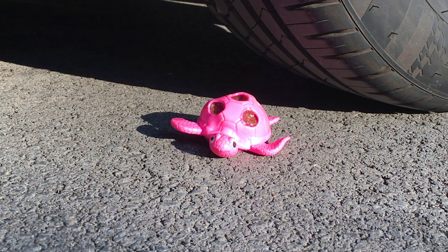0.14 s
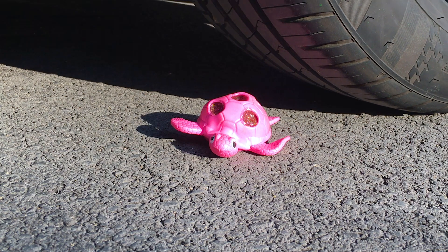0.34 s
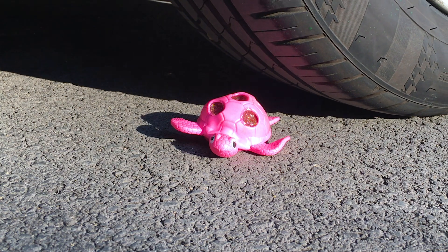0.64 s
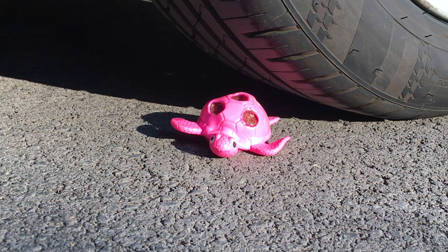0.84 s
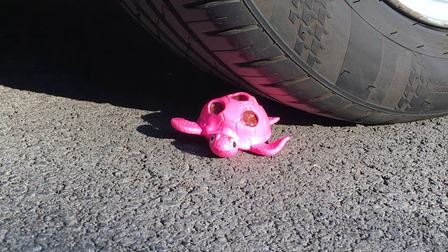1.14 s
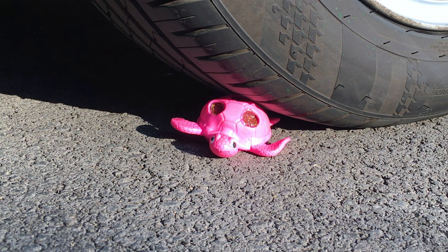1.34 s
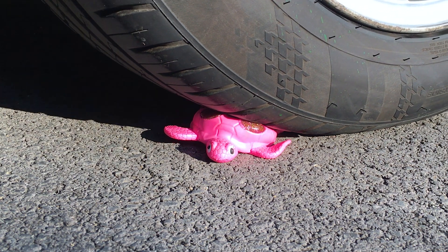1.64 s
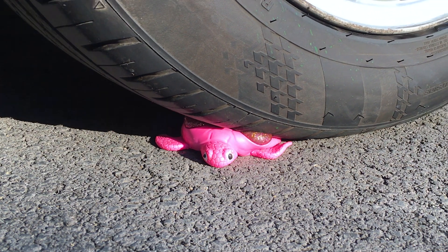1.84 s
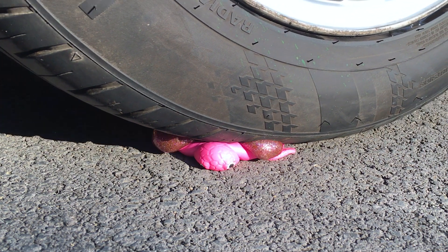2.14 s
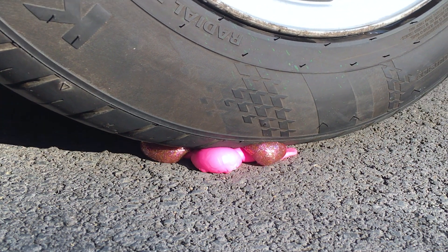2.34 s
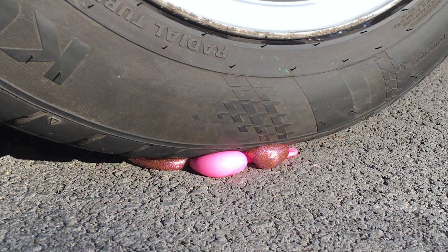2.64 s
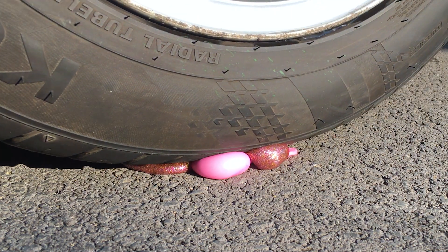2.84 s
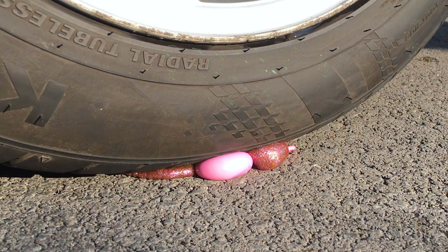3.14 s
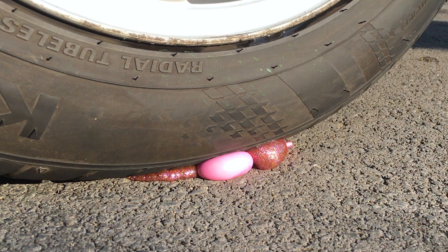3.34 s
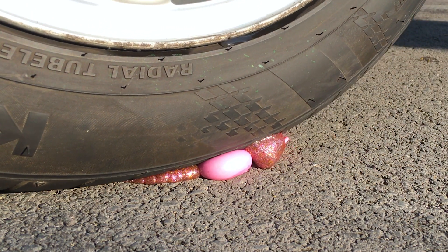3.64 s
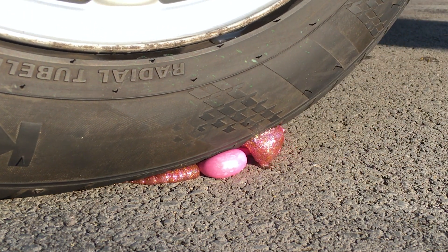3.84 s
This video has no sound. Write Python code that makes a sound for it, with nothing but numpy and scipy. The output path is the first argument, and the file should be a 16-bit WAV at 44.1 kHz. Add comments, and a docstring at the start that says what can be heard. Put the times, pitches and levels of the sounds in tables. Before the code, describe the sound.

A gel-filled toy is squashed by a car tyre on asphalt: low engine idle rises first, then wet spits and crackles, sharp pops, and a sputtering, squealing split at the end; close microphone outdoors.

```python
"""On asphalt, close to the microphone, a car creeps at idle over a soft gel-filled toy.
The engine, throbbing tones and noise with a faint whine, rises from silence; its belt swishes.
Shaped noise makes air spit from the skin, random clicks make gel and grit crackle, and ringing clicks snap and pop.
At last the toy splits: a sputter of noise puffs leads into a brief squeal made of gliding sine tones.
The car body and road echo a little, which is made with decaying noise."""
import sys
import numpy as np
from scipy import signal
from scipy.fft import rfft, irfft
from scipy.io import wavfile
from scipy.ndimage import uniform_filter1d

SR = 44100
rng = np.random.default_rng(int(sys.argv[2]) if len(sys.argv) > 2 else 0)


def put_to_file(sound):
    """Save the sound as 16-bit audio at rate SR, in the file named by the first command-line argument."""
    columns = np.atleast_2d(sound).T  # one column per channel
    safe = np.clip(columns, -1, 1)
    whole_steps = np.round(safe * 32767)
    wavfile.write(sys.argv[1], SR, whole_steps.astype(np.int16))


N = 176400  # four seconds of samples

# Low boom under the car.
BOOM_HZ, BOOM_WIDTH_HZ, BOOM_DB = 66.5, 14.6, -59

# Engine tones. Each row: multiple of the firing rate, level in dB relative to HUM_DB.
ENGINE_TONES = [(1, -1), (3, -3), (4, -19), (5, -19.5), (6, -19), (7, -22.5), (8, -22), (9, -20), (10, -24),
                (13, -23.5)]
FIRING_HZ, FIRING_DRIFT = 28.4, 0.00503  # drift is a fraction of the rate
HUM_DB, HUM_WAVER_DB, OVERTONE_WAVER_DB = -48, 1.3, 2
SILENCER_HZ = 42
# Tone at twice the firing rate. Each row: time in seconds, level in dB.
SECOND_TONE_LEVEL = [(.3, -64), (1.0, -50.5), (2.35, -51.5), (2.55, -51), (4, -64)]
# Engine loudness. Each row: time in seconds, bass level in dB, midrange level in dB.
ENGINE_LEVEL = [(0.06, -100, -100), (.085, -73, -68), (.14, -56, -57.5), (.17, -67.5, -74.5),
                (.31, -55.5, -66.5), (.6, -49.5, -60), (1.02, -43, -54.5), (2.4, -43, -55),
                (3.3, -42.5, -55.5), (4, -43.5, -56.5)]
BASS_REF_DB = -44.5  # the bass level that leaves the hum and boom unchanged
# Colour of the engine and fan noise. Each row: frequency in Hz, relative level in dB per Hz.
ENGINE_NOISE_COLOUR = [(20, -4.5), (70, 3.5), (105, -3.5), (190, 1.5), (260, -1), (430, -3.5), (640, -3.5),
                       (780, -8.5), (1150, -4), (1600, -12.5), (2100, -15.5), (2600, -25), (3200, -23),
                       (5000, -30.5), (6500, -35), (11000, -38.5), (16000, -61)]
NOISE_DB, FLUTTER_DB, THROB = -1.5, 0.45, .15  # throb is a fraction of the noise strength
# Whine at full engine strength. Each row: time in seconds, level in dB.
WHINE_LEVEL = [(.5, -71), (1.3, -69), (1.72, -61.5), (2.3, -62.5), (2.5, -62), (2.85, -59.5), (3.5, -60.5),
               (4, -65.5)]
WHINE_HZ, WHINE_WIDTH_HZ = 1010, 46

# Resonances of the belt. Each row: frequency in Hz, width in Hz, relative level in dB.
BELT_RESONANCES = [(1400, 900, -20), (2000, 450, -19.5), (2970, 490, -20), (3950, 430, -30),
                   (5940, 700, -28.5)]
# Belt loudness as the wheel hides it. Each row: time in seconds, level change in dB.
BELT_LEVEL = [(1.3, 0), (2.3, -2.5), (3.2, -1.5)]
BELT_HZ, BELT_SWING_DB, BELT_UNEVEN_DB, BELT_GRAIN_DB = 11.4, 9, 2, 3

# Short sounds: a low handling bump, snaps, small pops, a ringing spit and a late squeak.
# Each row: start in seconds, level in dB, centre in Hz, width in Hz, decay in seconds.
SHORT_SOUNDS = [(.112, -53, 192, 90, 0.015), (2.123, -61.5, 7420, 400, .005),
                (2.206, -69.5, 6760, 2000, .01), (2.413, -44, 3200, 2500, .001),
                (2.4204, -34, 3500, 1980, 0.00075), (2.5043, -42, 3900, 2500, .0006),
                (2.5183, -31, 4010, 700, 0.0019), (2.5592, -39.5, 1130, 795, 0.002),
                (2.618, -53, 2800, 3500, 0.0011), (3.0225, -15, 6700, 4230, 0.00024),
                (3.0842, -42.5, 5200, 8900, 0.0024), (3.1447, -58, 7000, 7000, .0004),
                (3.1546, -39.5, 5930, 3560, 0.0005), (3.154, -49.5, 11300, 900, 0.0011),
                (3.2, -42, 7800, 7500, 0.00028), (3.2825, -45, 5340, 12100, 0.00053),
                (3.296, -35.5, 14200, 1600, 0.0009), (3.3335, -60, 11000, 7000, .0005),
                (3.3455, -51, 6000, 11000, 0.00088), (3.423, -36, 14650, 1900, 0.00057),
                (3.609, -52.5, 4340, 4500, .0006), (3.9509, -24.5, 3870, 1000, .0022),
                (3.9805, -47, 3700, 400, 0.0026)]
SHORT_CLICK_DB, SHORT_ROOM_DB, SHORT_T60_S = -22, -14, 0.1
GRIT_PER_S, GRIT_FROM_S, GRIT_DB = 20, 2.65, -89
KNOCK_S, KNOCK_WIDTH_S, KNOCK_DB, KNOCK_LOW_HZ = 3.0865, 0.00062, -25, 90

# Wet crackle of gel between the spits. Each row: time in seconds, level in dB.
OOZE_LEVEL = [(2.378, -110), (2.392, -53), (2.45, -56), (2.49, -74), (2.525, -53), (2.58, -68), (2.7, -87),
              (2.8, -130)]
OOZE_PER_S, OOZE_TILT_DB = 460, -4.5  # tilt is per octave
# Air spitting out of the toy.
# Each row: start in seconds, length in seconds, level in dB, tilt in dB per octave.
AIR_SPITS = [(2.3828, 0.0011, -37, 2), (2.3852, 0.0037, -33.5, 0.5), (2.3925, 0.0019, -35, -2),
             (2.399, 0.0012, -53, -12), (2.4393, 0.0037, -39.5, -3), (2.4462, 0.0032, -40.5, 2.5),
             (2.452, 0.0013, -40, 1), (2.5123, 0.00092, -42, 0), (2.517, 0.0022, -36.5, -1.5),
             (2.522, 0.0039, -38.5, -1.5), (2.5577, .002, -45, -5.5), (2.704, 0.0092, -50.5, -5.5),
             (1.672, 0.0058, -57.5, -3)]
# Colour of spits and gel. Each row: frequency in Hz, relative level in dB per Hz.
SPIT_COLOUR = [(300, -23.5), (900, -5), (1400, 0.5), (2600, -5.5), (3900, 1.5), (4900, -2.5), (5700, -0.5),
               (8500, -1.5), (10300, -5), (12200, -2), (16000, -7.5)]
PUFF_ATTACK_S, SPIT_RELEASE_S, SPIT_GRAIN = 0.00048, 0.0011, 0.58
SPIT_ROOM_DB, SPIT_T60_S = -12, 0.3

# Puffs as the skin splits.
# Each row: start in seconds, length in seconds, level in dB, tilt in dB per octave.
SPLIT_PUFFS = [(3.901, .0009, -26, 3), (3.903, 0.00065, -13, 3), (3.9051, 0.0019, -18, 2),
               (3.9083, 0.0019, -13, -1.5), (3.9108, 0.0032, -18, 2), (3.915, .011, -21.5, -0.5),
               (3.951, 0.0036, -40, 4.5)]
# Colour of the split. Each row: frequency in Hz, relative level in dB per Hz.
SPLIT_COLOUR = [(500, -55), (1080, -24.5), (1450, -1), (1950, -11.5), (2350, 1), (3000, -5.5), (3600, 10.5),
                (4600, -4.5), (5700, -10), (6500, -22.5), (8000, -3), (9500, -6), (10500, -11.5),
                (11600, -2.5), (13200, -8.5), (15500, -20)]
SPLIT_RELEASE_S, SPLIT_GRAIN, SPLIT_ROOM_DB, SPLIT_T60_S = 0.0017, 0.52, -24, 0.17
# Squeal of the torn edge. Each row: time in seconds, central pitch in Hz, level in dB.
SQUEAL_PATH = [(3.9135, 3960, -47), (3.915, 3886, -13.5), (3.918, 3826, -7.5), (3.9215, 3690, -11),
               (3.923, 3610, -17), (3.9255, 3630, -14), (3.9275, 3650, -21), (3.931, 3630, -44)]
# Tones in the squeal. Each row: multiple of the pitch, relative level in dB.
SQUEAL_PARTIALS = [(1, 0.5), (2, -35), (3, -23.5), (4, -28)]
SQUEAL_ROOM_DB = -23.5

# Early echo fade time, its strength against the tail, and the treble limits of echo and recorder.
EARLY_S, EARLY_DB, ROOM_TOP_HZ, TOP_HZ = 0.0042, 8.5, 11000, 15850


def undb(db):
    """Turn decibels into gain."""
    return 10 ** (np.asarray(db) / 20)


def unit(x):
    """Scale a sound to an average (rms) strength of 1."""
    return x / np.sqrt(np.mean(x ** 2) + 1e-24)


def curve(rows, axis=1):
    """Join one column of a table by straight lines in time."""
    rows = np.array(rows)
    return np.interp(np.arange(N) / SR, rows[:, 0], rows[:, axis])


def walk(rate):
    """Smooth random wander with a spread near 1, from new random steps at a given rate per second."""
    step = int(SR / rate)
    steps = np.repeat(rng.standard_normal(N // step + 1), step)
    smooth = uniform_filter1d(uniform_filter1d(steps, step), step)
    return unit(smooth[:N])


def freqs(x):
    """Frequencies of the spectrum of x, kept above zero."""
    return np.maximum(np.fft.rfftfreq(len(x), 1 / SR), 1)


def colour(x, points, tilt=0):
    """Filter by a (Hz, dB) spectrum and a tilt in dB per octave."""
    hz, db = np.array(points).T
    octave = np.log2(freqs(x))
    gain_db = np.interp(octave, np.log2(hz), db) + tilt * octave
    return irfft(rfft(x) * undb(gain_db), len(x))


def resonate(x, hz, width_hz):
    """A resonance applied twice, so sound away from its centre falls off steeply."""
    f = freqs(x)
    detuning = (f * f - hz * hz) / (f * width_hz * np.sqrt(2))
    return irfft(rfft(x) / (1 + 1j * detuning) ** 2, len(x))


def add(out, start_s, x):
    """Mix a short sound in at its time."""
    i = int(start_s * SR)
    out[i:i + len(x)] += x[:len(out) - i]


def crackle(per_s):
    """Random tiny clicks of uneven strength."""
    hits = rng.random(N) < per_s / SR
    return hits * rng.uniform(-1, 1, N)


def echo(x, wet_db, t60_s):
    """Quick reflections between tyre and road, then a faint outdoor tail, both as fading noise."""
    t = np.arange(SR // 2) / SR
    early = undb(EARLY_DB) * np.exp(-t / EARLY_S)
    late = np.exp(-np.log(1000) * t / t60_s)  # falls by 60 dB in t60_s
    tail = rng.standard_normal(len(t)) * (early + late)
    tail = irfft(rfft(tail) / np.sqrt(1 + (freqs(tail) / ROOM_TOP_HZ) ** 4), len(t))
    return x + undb(wet_db) * signal.fftconvolve(x, tail / np.linalg.norm(tail))[:N]


def boom():
    """Uneven low resonance under the car: noise kept to a narrow band."""
    rumble = unit(resonate(rng.standard_normal(N), BOOM_HZ, BOOM_WIDTH_HZ))
    return rumble * undb(curve(ENGINE_LEVEL) - BASS_REF_DB + BOOM_DB)


def engine():
    """Idling engine: tones at multiples of the firing rate, throbbing noise and a thin whine."""
    phase = 2 * np.pi * np.cumsum(FIRING_HZ * (1 + FIRING_DRIFT * walk(3.6))) / SR

    def tone(k):
        """One firing multiple, flipped above the silencer's resonance."""
        sign = np.sign(SILENCER_HZ - k * FIRING_HZ)
        offset = (k > 3.5) * rng.uniform(0, 2 * np.pi)  # only the higher tones start at random
        return sign * np.cos(round(k) * phase + offset)

    hum = np.zeros(N)
    for k, db in ENGINE_TONES:
        waver_db = HUM_WAVER_DB if k < 4 else OVERTONE_WAVER_DB
        hum += undb(db + waver_db * walk(8)) * tone(k)
    bass = undb(curve(ENGINE_LEVEL) - BASS_REF_DB)
    second = undb(curve(SECOND_TONE_LEVEL)) * np.minimum(10 * bass, 1) * tone(2)

    noise = unit(colour(rng.standard_normal(N), ENGINE_NOISE_COLOUR))
    noise *= (1 + THROB * np.cos(phase)) * undb(FLUTTER_DB * walk(18))
    noise *= undb(curve(ENGINE_LEVEL, axis=2) + NOISE_DB)
    whine = unit(resonate(rng.standard_normal(N), WHINE_HZ, WHINE_WIDTH_HZ))
    whine *= undb(curve(WHINE_LEVEL)) * np.minimum(bass, 1)
    return np.sqrt(2) * (hum * bass * undb(HUM_DB) + second) + noise + whine


def belt():
    """A drive belt gives a short, grainy swish once a turn, at uneven strength."""
    pulse = np.cos(np.pi * BELT_HZ * np.arange(N) / SR) ** 4  # one peak a turn
    turn_db = BELT_SWING_DB * pulse + BELT_UNEVEN_DB * walk(25)
    rub = np.zeros(N)
    for hz, width, db in BELT_RESONANCES:
        band = resonate(rng.standard_normal(N), hz, width)
        rub += unit(band * undb(turn_db + BELT_GRAIN_DB * walk(200))) * undb(db)
    return rub * undb(curve(ENGINE_LEVEL, axis=2) + curve(BELT_LEVEL))


def grit():
    """Sparse faint crackle of sand under the loaded tread."""
    clicks = crackle(GRIT_PER_S) * (np.arange(N) / SR > GRIT_FROM_S)
    return unit(resonate(clicks, 5900, 5000)) * undb(GRIT_DB)


def knock():
    """One soft low pressure pulse."""
    distance = (np.arange(N) / SR - KNOCK_S) / KNOCK_WIDTH_S
    pulse = undb(KNOCK_DB) / (1 + distance ** 2)
    return signal.sosfilt(signal.butter(1, KNOCK_LOW_HZ, "high", fs=SR, output="sos"), pulse)


def short_sounds(size=4096):
    """Single short sounds, each a fading burst of noise that rings in its own band."""
    out, t = np.zeros(N), np.arange(size) / SR
    for start, db, hz, width, decay in SHORT_SOUNDS:
        env = np.exp(-t / decay)
        click = rng.standard_normal(size) * env
        low = np.hypot(hz, width / 2) - width / 2
        high = min(low + width, SR / 2 - 1)
        band = signal.butter(4, [low, high], "band", fs=SR, output="sos")
        ring = unit(signal.sosfilt(band, click))
        ring += undb(SHORT_CLICK_DB) * unit(resonate(click, hz, hz))  # a fainter, broader click
        add(out, start, ring * np.sqrt(np.mean(env ** 2)) * undb(db))
    return out


def ooze():
    """Tiny bubbles burst as the gel is pressed out: many coloured random clicks."""
    return unit(colour(crackle(OOZE_PER_S), SPIT_COLOUR, OOZE_TILT_DB)) * undb(curve(OOZE_LEVEL))


def puffs(rows, spectrum, release_s, grain, size=2048):
    """Grainy jets of air through wet skin: sharp attack, short hold, quick release."""
    out, t = np.zeros(N), np.arange(size) / SR
    lead = size // 4  # room ahead of the puff for the filter to spread
    for start, length, db, tilt in rows:
        jet, rough = rng.standard_normal((2, size))
        env = np.minimum(t / PUFF_ATTACK_S, 1) * np.exp(-np.maximum(t - length, 0) / release_s)
        grainy = jet * np.exp(grain * rough) * env
        puff = colour(np.roll(grainy, lead), spectrum, tilt)
        add(out, start - lead / SR, unit(puff) * np.sqrt(np.mean(env ** 2)) * undb(db))
    return out


def squeal():
    """The torn edge flutters like a reed, sagging in pitch as the pressure goes."""
    t = np.arange(N) / SR
    pitch = curve(SQUEAL_PATH) * (1 + 0.0076 * walk(1500))  # fast, slight pitch jitter
    phase = 2 * np.pi * np.cumsum(pitch) / SR
    tone = sum(undb(db) * np.sin(round(k) * phase) for k, db in SQUEAL_PARTIALS)
    sounding = (t > SQUEAL_PATH[0][0]) * (t < SQUEAL_PATH[-1][0])
    return np.sqrt(2) * tone * undb(curve(SQUEAL_PATH, axis=2)) * sounding


def scene():
    """Engine, short sounds, crackles and the final split, in one channel."""
    car = boom() + engine() + belt()
    details = echo(short_sounds() + grit(), SHORT_ROOM_DB, SHORT_T60_S) + knock()
    spits = puffs(AIR_SPITS, SPIT_COLOUR, SPIT_RELEASE_S, SPIT_GRAIN)
    spits = echo(spits + ooze(), SPIT_ROOM_DB, SPIT_T60_S)
    sputter = puffs(SPLIT_PUFFS, SPLIT_COLOUR, SPLIT_RELEASE_S, SPLIT_GRAIN)
    split = echo(sputter, SPLIT_ROOM_DB, SPLIT_T60_S)
    split = split + echo(squeal(), SQUEAL_ROOM_DB, SPLIT_T60_S)
    return (car + details + spits + split)[None]


def record(dry):
    """The recorder steeply cuts the treble above its top frequency."""
    return signal.sosfilt(signal.ellip(8, .2, 70, TOP_HZ, fs=SR, output="sos"), dry)


dry = scene()
out = record(dry)
put_to_file(out)
```